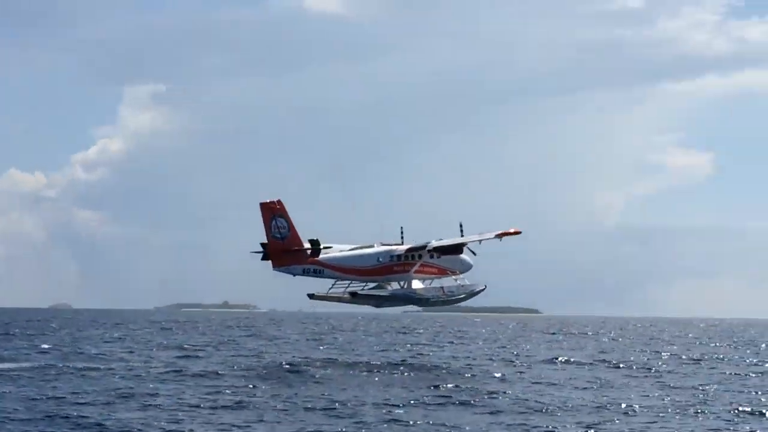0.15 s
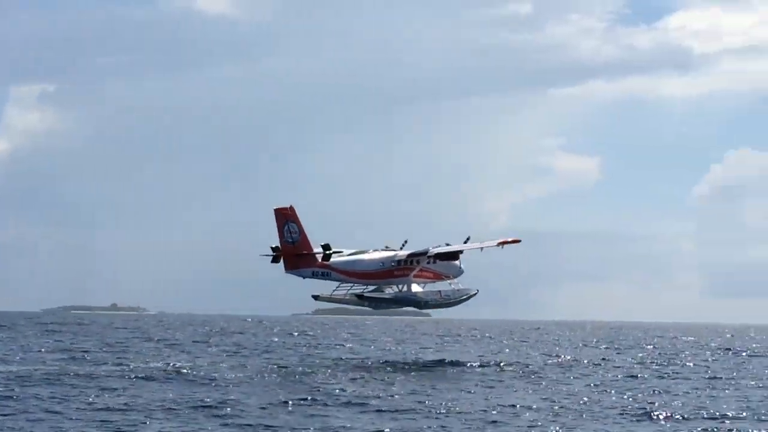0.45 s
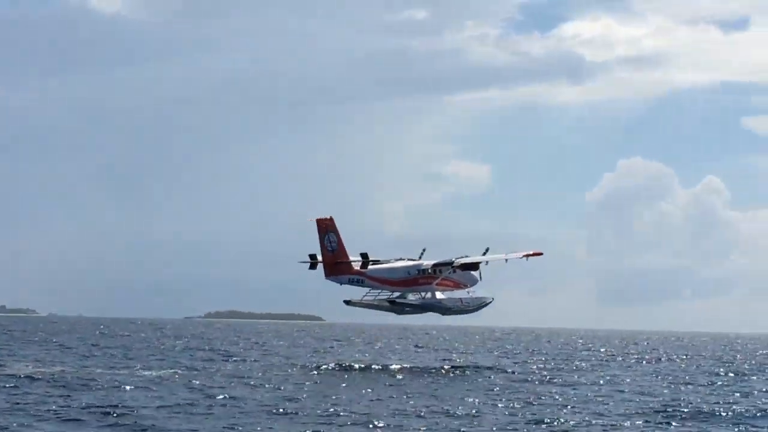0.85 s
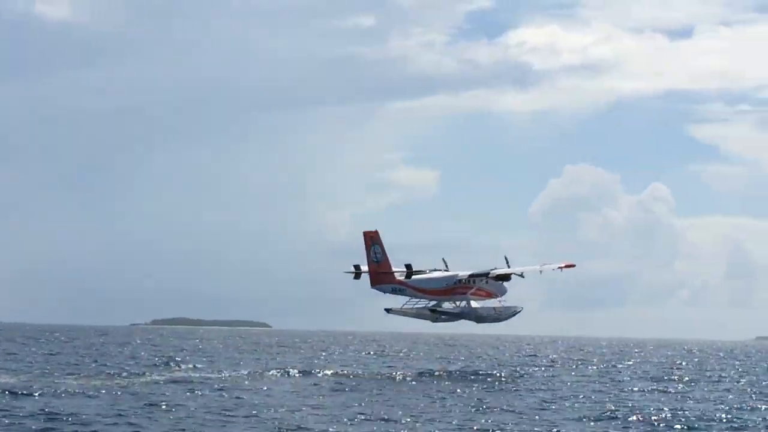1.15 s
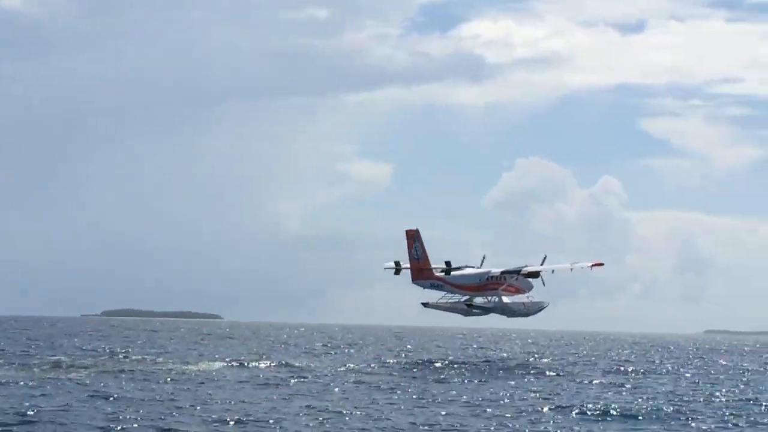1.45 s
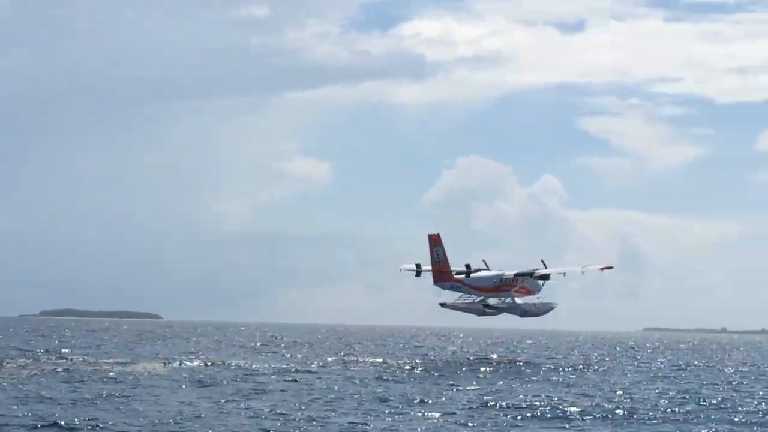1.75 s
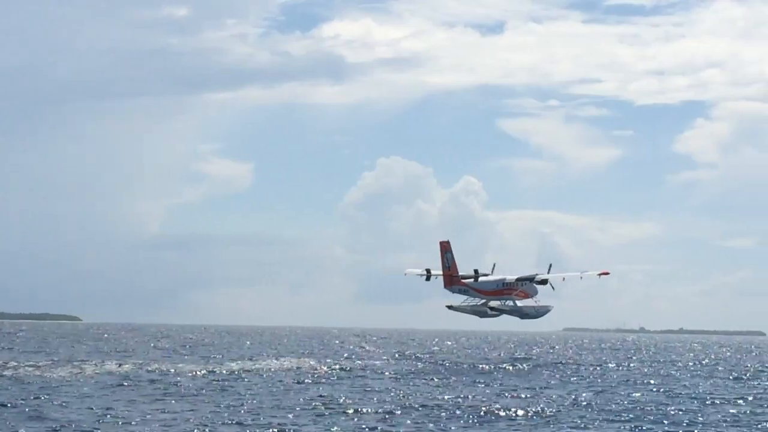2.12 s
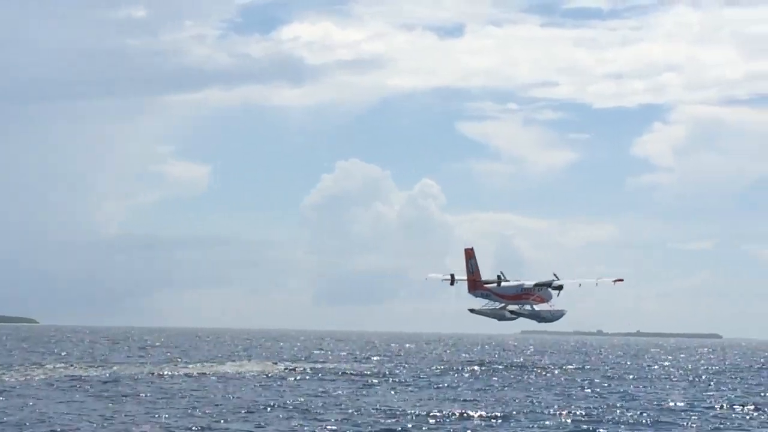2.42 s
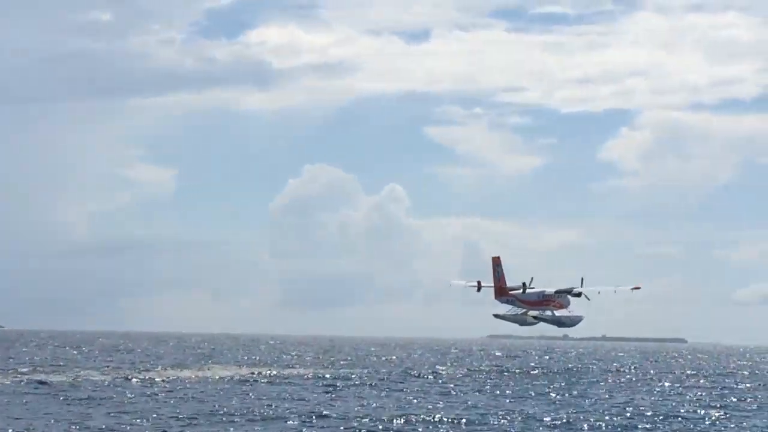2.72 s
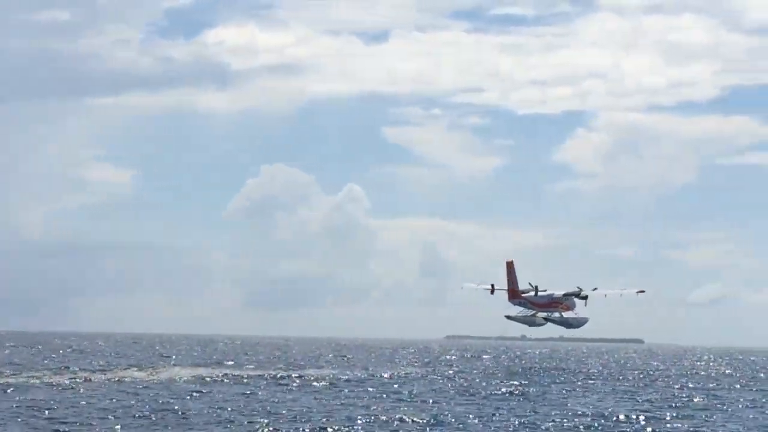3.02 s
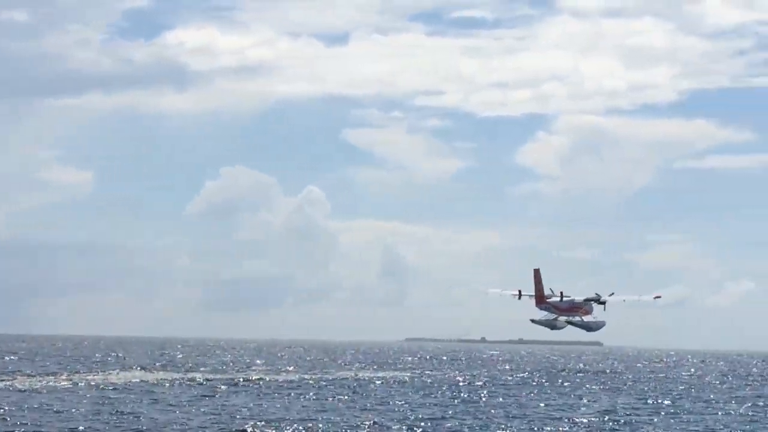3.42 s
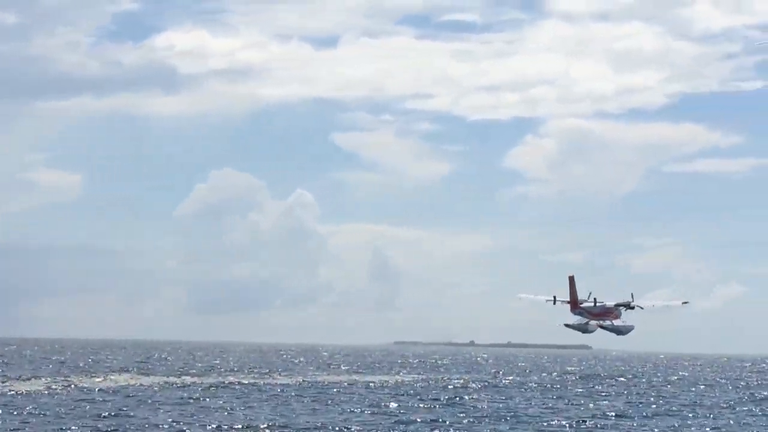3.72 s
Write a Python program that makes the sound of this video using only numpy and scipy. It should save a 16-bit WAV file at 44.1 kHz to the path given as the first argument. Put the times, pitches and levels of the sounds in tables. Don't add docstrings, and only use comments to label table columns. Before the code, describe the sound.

A twin-propeller seaplane flies away over open sea, heard on one microphone at the shore. From 0 s a strong, deep hum near 100 hertz throbs over low rumble, sagging slightly in pitch. After about 2 s it weakens and flutters unevenly, leaving brighter, slightly hollow turbine hiss and faint high whine. Small wind thumps come at the start, 0.7, 1.8, 2.6 and 3 s, strongest near 3.7 s.

```python
import sys
import numpy as np
from scipy import signal
from scipy.fft import rfft, irfft, next_fast_len
from scipy.io import wavfile
from scipy.ndimage import uniform_filter1d, map_coordinates

SR = 44100
rng = np.random.default_rng(int(sys.argv[2]) if len(sys.argv) > 2 else 0)


def wav_out(sig):
    wavfile.write(sys.argv[1], SR, np.round(np.clip(np.atleast_2d(sig).T, -1, 1) * 32767).astype(np.int16))


def elevation(decibels):
    levels = np.asarray(decibels, float)
    return 10 ** (levels / 20)


N = 170226

# t/s, tone level/dB, octave level/dB, third order level/dB, fourth order level/dB
BLADE_ORDERS = [(0, -11, -23, -49, -34.5), (.25, -12.5, -30, -43.5, -45), (.5, -12.5, -31.5, -44, -40.5),
                (.75, -13.5, -42, -51, -36.5), (1.1, -14.5, -29, -49.5, -45.5),
                (1.4, -14, -22.5, -45.5, -63), (1.65, -17.5, -29.5, -53, -66), (1.9, -15, -31.5, -37, -69),
                (2.2, -21, -26.5, -48.5, -71), (2.45, -22.5, -28.5, -42, -69), (2.7, -24.5, -46, -38, -52),
                (2.9, -25, -32, -37.5, -45), (3.02, -25.5, -26, -40, -55), (3.36, -28.5, -28.5, -50.5, -51),
                (3.44, -45, -29, -52, -55), (3.56, -37, -26, -33, -54), (3.68, -23.5, -30, -48.5, -58),
                (3.8, -42, -33, -39.5, -60)]


def unit(x):
    return x / np.sqrt(np.mean(x ** 2) + 1e-20)


def curves(rows):
    s, *cols = np.transpose(rows)
    return [np.interp(np.arange(N) / SR, s, c) for c in cols]


def wobble(rate):
    knots = rng.standard_normal(int(N * rate / SR) + 4)
    return map_coordinates(knots, [np.arange(N) * rate / SR])


def filtered(x, response):
    m = next_fast_len(N + 8192)
    return irfft(rfft(x, m) * response(np.fft.rfftfreq(m, 1 / SR)), m)[:N]


def rush(spectrum, patchy_db):
    z = signal.stft(rng.standard_normal(N), nperseg=512)[2]
    field = rng.standard_normal(z.shape)
    field = uniform_filter1d(uniform_filter1d(field, 6, 0), 14, 1)
    x = signal.istft(z * elevation(patchy_db * unit(field)), nperseg=512)[1][:N]
    f, v = np.transpose(spectrum)

    def colour(hz):
        return elevation(np.interp(np.log(hz + 1), np.log(f + 1), v, -120, -120))

    return unit(filtered(x, colour))


def tone(hz, db):
    phase = 2 * np.pi * (np.cumsum(hz) / SR + rng.random())
    return np.sqrt(2) * elevation(db) * np.sin(phase)


def narrow(hz, width_hz):
    def bell(f):
        return np.exp(-.5 * (f / width_hz) ** 2)

    pair = [unit(filtered(rng.standard_normal(N), bell)) for _ in range(2)]
    turn = 2 * np.pi * np.cumsum(hz) / SR
    return pair[0] * np.cos(turn) + pair[1] * np.sin(turn)


def near_propeller():
    # t/s, f/Hz, level/dB
    throb = [(0, 43.8, -24), (.5, 46.8, -25), (1.1, 48.5, -27), (1.9, 50, -28.5), (2.3, 52.8, -32),
             (2.8, 55, -38), (3.4, 56, -48), (3.86, 57, -50)]
    # multiple of the blade rate, level at start/dB, change/(dB/s)
    upper = [(5, -42, -19), (6, -56, -6.5), (8, -53.5, -2)]
    t = np.arange(N) / SR
    hz = 97.2 + 3.4 * np.exp(-t / 1.4)
    tone_db, octave_db, third_db, fourth_db = curves(BLADE_ORDERS)
    throb_hz, throb_db = curves(throb)

    depth_db = .7 + .25 * t ** 2
    shimmer_db = depth_db * wobble(20.99)

    out = tone(hz, tone_db + shimmer_db)
    out += tone(2 * hz, octave_db + (1.6 + .7 * depth_db) * wobble(23))
    out += tone(3 * hz, third_db + 1.4 * wobble(9.9))
    out += tone(4 * hz, fourth_db + 0.72 * wobble(12))
    out += tone(throb_hz, throb_db + shimmer_db)
    out += tone(2 * hz - throb_hz, throb_db - 11 + 3 * wobble(9.54))
    for k, db, fade in upper:
        out += tone(k * hz, db + fade * t + 1.0 * wobble(7))
    return out


def second_propeller():
    # multiple of the blade rate, level/dB, share of the near third order's swells
    orders = [(2, -36, 0.015), (3, -44.5, 0.86), (4, -50.5, 0.48), (5, -55, 0), (6, -55, 0)]
    third_db = curves(BLADE_ORDERS)[2]
    swell_db = third_db - third_db.mean()
    hz = 103.75 + 1.538 * wobble(12)
    return sum(tone(k * hz, db + share * swell_db + 2.3 * wobble(15)) for k, db, share in orders)


def off_the_sea(jet):
    t = np.arange(N) / SR
    delay_s = .00278 - 0.000474 * t
    dull = filtered(jet, lambda hz: 1 / (1 + (hz / 4000) ** 2))
    echo = map_coordinates(dull, [np.arange(N) - delay_s * SR], order=3, mode="mirror")
    peak_s, span_s = 2.4, 1.1
    return .4 * np.exp(-.5 * ((t - peak_s) / span_s) ** 2) * echo


def turbines():
    # t/s, level/dB, brightness/dB
    jet_swell = [(0, -34, -2), (.2, -34.5, -3), (.5, -35, -3.5), (.68, -37.5, -4), (.93, -36.5, -1.5),
                 (1.2, -38.5, -2.5), (1.55, -39.5, -2.5), (1.9, -38, -2.5), (2.3, -41, 1.5), (2.6, -39, 1),
                 (2.85, -37, 2.5), (3.2, -38.5, 2), (3.5, -38, 3), (3.78, -39, 2), (3.86, -34.5, -3)]
    # f/Hz, density/dB
    jet_low = [(200, -28), (260, 5.5), (450, -2), (900, -1.5), (1500, -5), (1900, -8.5), (3000, -18),
               (5000, -40)]
    # f/Hz, density/dB
    jet_high = [(880, -5), (1500, -17.5), (2210, -2.5), (4240, -2.5), (8460, -8.5), (9230, -5.5),
                (9980, -10.5), (12000, -11.5), (15300, -22.5)]
    # t/s, f/Hz, level/dB
    whine_path = [(0.0, 9410, -57), (3.86, 9170, -54.5)]
    t = np.arange(N) / SR
    jet_db, bright_db = curves(jet_swell)
    jet_db = jet_db + .35 * wobble(22)
    roar = elevation(-0.5 + 0.3 * wobble(5.52)) * rush(jet_low, patchy_db=1.5)
    hiss = elevation(-4.0 + bright_db + 0.51 * wobble(6.97)) * rush(jet_high, patchy_db=0.9)
    jet = elevation(jet_db) * (roar + hiss)

    whine_hz, whine_db = curves(whine_path)
    whine = elevation(whine_db + 1.3 * wobble(6.4)) * narrow(whine_hz, width_hz=160)

    fan_db = -51 - 2.1 * t + .6 * wobble(2.6) + jet_db - jet_db.mean()
    fan = elevation(fan_db) * narrow(np.full(N, 11280), width_hz=1100)
    return jet + off_the_sea(jet) + whine + fan


def airframe_rumble():
    # f/Hz, density/dB
    rumble_colour = [(8, -27), (25, -2), (45, -4), (80, 4), (160, -0.5), (230, -8.5), (450, -27)]
    tone_db = curves(BLADE_ORDERS)[0]
    level_db = -32.5 + .5 * (tone_db - tone_db.mean()) + 1.4 * wobble(9)
    return elevation(level_db) * rush(rumble_colour, patchy_db=-0.5)


def wind_puffs():
    # t/s, level/dB
    puffs = [
        (.01, -25),
        (.7, -33),
        (1.81, -30),
        (2.6, -29),
        (2.97, -31),
        (3.68, -23),
    ]
    # f/Hz, density/dB
    puff_colour = [(30, -20), (70, -6), (150, 0), (350, -10), (550, -20), (800, -60)]
    t = np.arange(N) / SR
    width_s = .016
    gusts = sum(elevation(db) * np.exp(-.5 * ((t - s) / width_s) ** 2) for s, db in puffs)
    return gusts * rush(puff_colour, patchy_db=2)


def scene():
    propellers = near_propeller() + second_propeller()
    return (propellers + turbines() + airframe_rumble() + wind_puffs())[None]


def band_limit(x):
    return signal.sosfilt(signal.butter(12, 15400, fs=SR, output="sos"), x)


def record(dry):
    mix = filtered(dry[0], lambda hz: hz < 15400)[None]
    return band_limit(mix)


dry = scene()
out = record(dry)
wav_out(out)
```